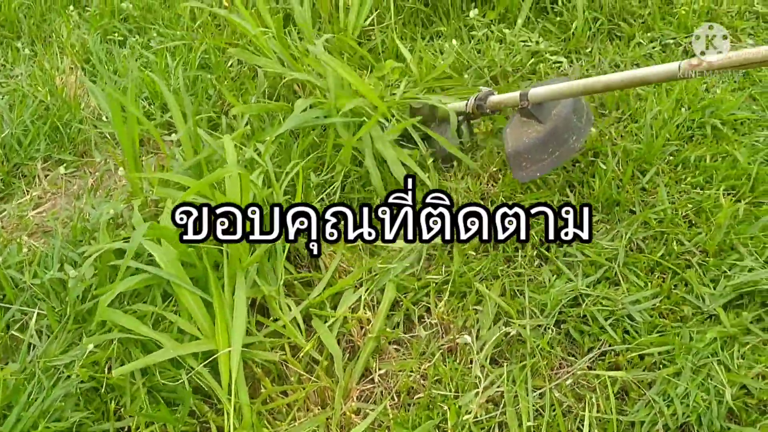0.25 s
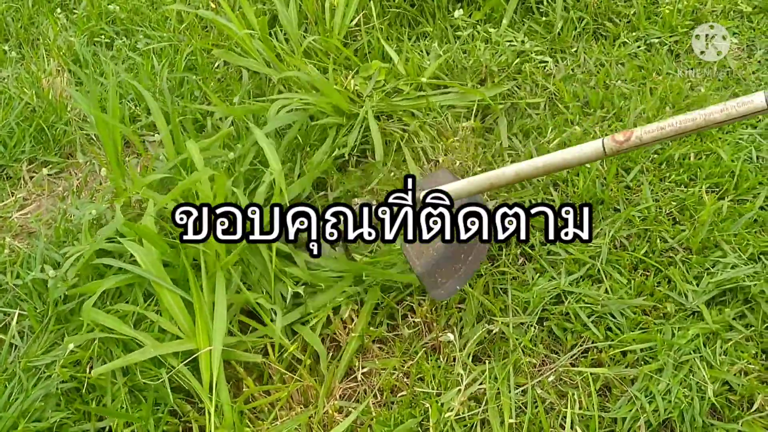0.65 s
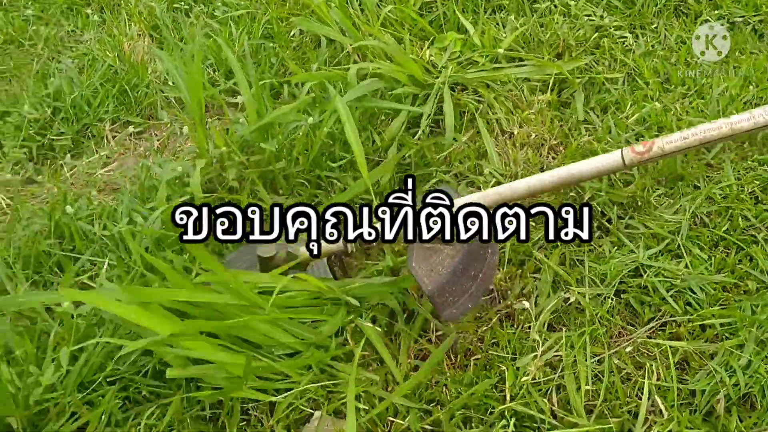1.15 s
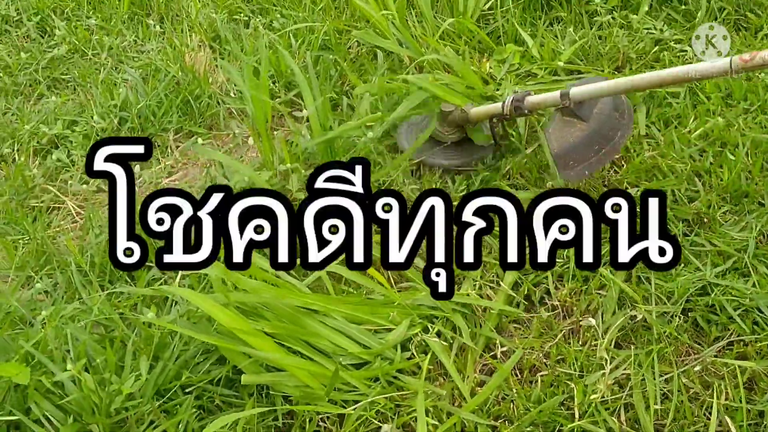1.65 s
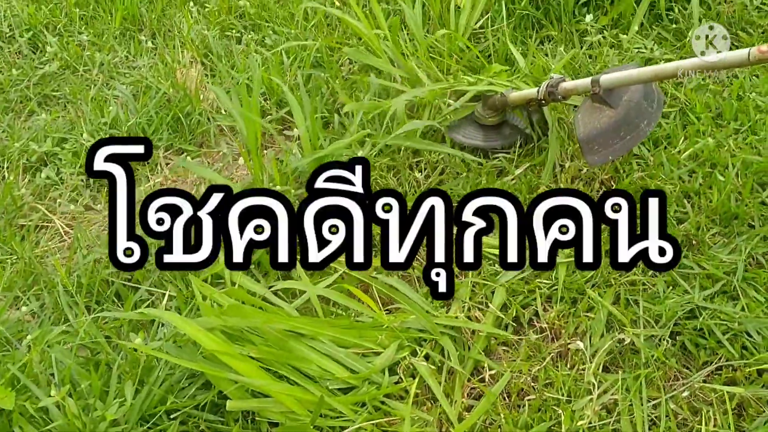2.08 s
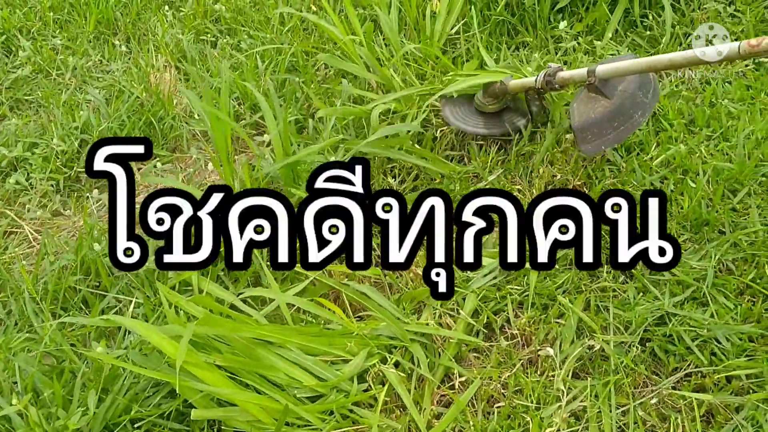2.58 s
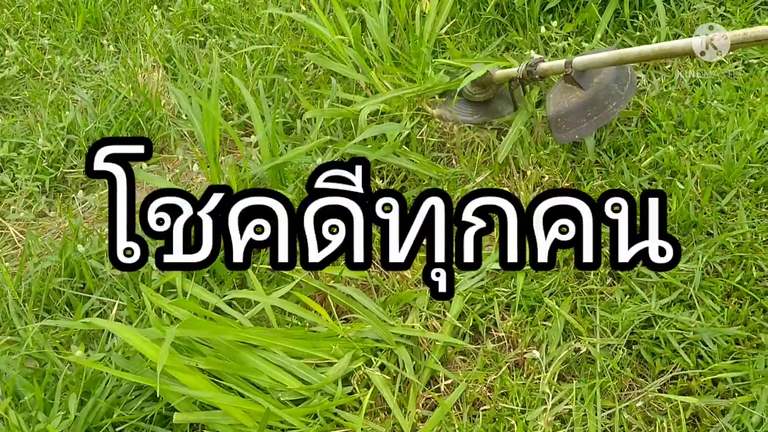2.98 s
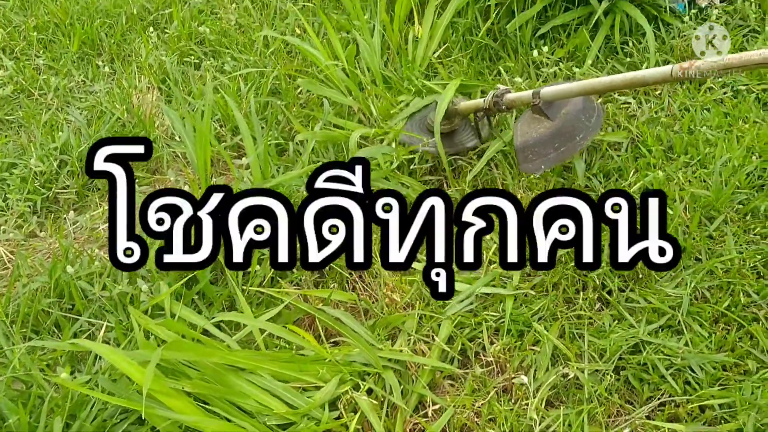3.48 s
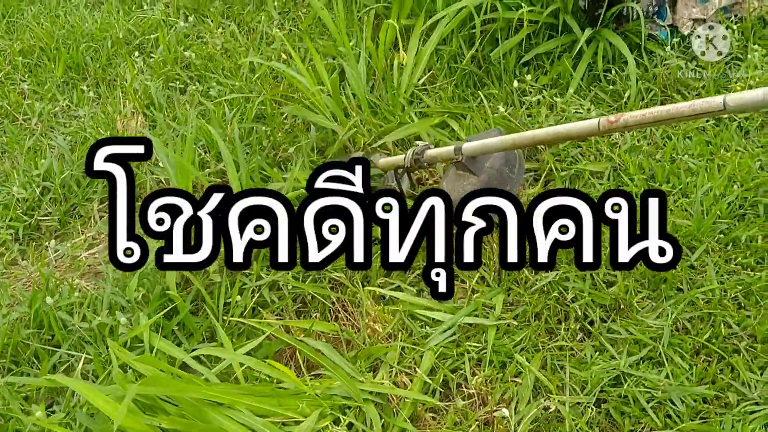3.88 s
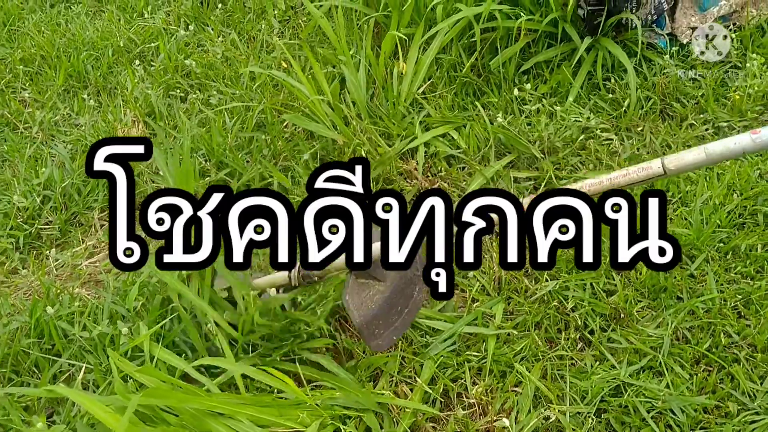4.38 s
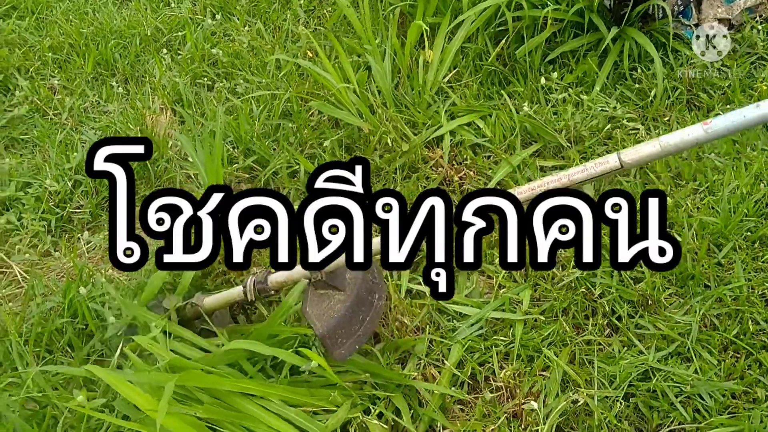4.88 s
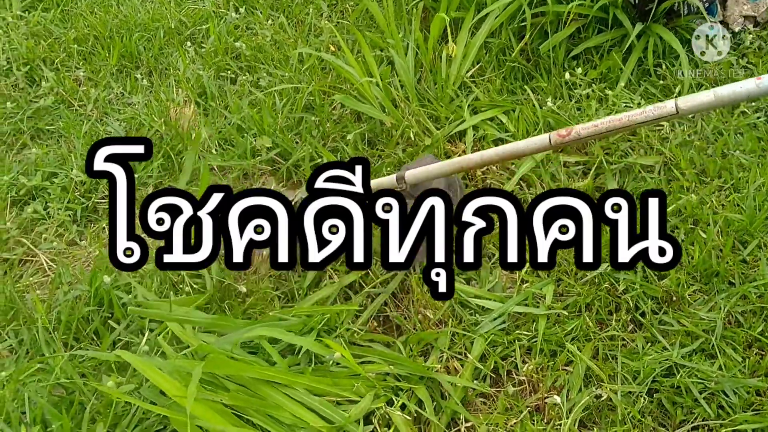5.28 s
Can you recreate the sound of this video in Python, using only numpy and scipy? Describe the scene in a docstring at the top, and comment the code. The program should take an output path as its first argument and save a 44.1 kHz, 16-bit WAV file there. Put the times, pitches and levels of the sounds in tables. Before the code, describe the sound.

Outdoors and close to a phone microphone, a small two-stroke brush cutter runs continuously at part throttle, firing unevenly with a coarse, sputtering bark. The drive shaft rattles metallically, while a spinning steel blade hisses and rings through grass in short swells. The bark softens early, returns strongly mid-way, then weakens again. Two short grinding bites stand out near two and just after three seconds.

```python
"""A two-stroke brush cutter at part throttle barks outdoors, close by, as its steel blade sweeps through grass.
The engine fires mostly every second or third turn: impulses ring muffler resonances and rattle the drive shaft.
Blade slashes are noise bursts through ringing steel modes, over the shaped hiss of torn grass and rushing air.
The clutch sings and the gears whine faintly as wavering sines; two thick stalks grind on the steel."""
import sys
import numpy as np
from scipy import signal
from scipy.fft import rfft, irfft
from scipy.io import wavfile
from scipy.ndimage import uniform_filter1d

SR = 44100
rng = np.random.default_rng(int(sys.argv[2]) if len(sys.argv) > 2 else 0)


def store_wav(level_fs):
    """Save 16-bit WAV to argv[1]."""
    pcm = np.round(np.clip(np.atleast_2d(level_fs), -1, 1) * 32767)
    wavfile.write(sys.argv[1], SR, pcm.T.astype(np.int16))


N = 244314
TIME = np.arange(N) / SR


def undb(db):
    """Decibels to amplitude gain."""
    return 10 ** (np.asarray(db) / 20)


def unit(x):
    """Scale to rms 1."""
    return x / np.sqrt(np.mean(x ** 2))


def curves(table):
    """Columns of a table, interpolated linearly over time."""
    time_s, *columns = np.transpose(table)
    return [np.interp(TIME, time_s, column) for column in columns]


def walk(rate_hz):
    """Smooth random wander of rms 1, with rate_hz new random values per second."""
    step = int(SR / rate_hz)
    held = np.repeat(rng.standard_normal(N // step + 1), step)
    return unit(uniform_filter1d(held, step)[:N])


def ring(x, modes):
    """Sum of parallel resonances (centre_hz, width_hz, gain_db) driven by x."""
    total = 0
    for centre_hz, width_hz, gain_db in modes:
        b, a = signal.iirpeak(centre_hz, centre_hz / width_hz, fs=SR)
        total = total + undb(gain_db) * signal.lfilter(b, a, x)
    return total


def cut(x, cutoff_hz, kind, order):
    """Butterworth low-pass or high-pass."""
    return signal.sosfilt(signal.butter(order, cutoff_hz, kind, fs=SR, output="sos"), x)


def noise(spectrum):
    """Gaussian noise of rms 1, shaped by (frequency_hz, density_db) points on a log-frequency axis."""
    frequency_hz, density_db = np.transpose(spectrum)
    bins_hz = np.maximum(np.fft.rfftfreq(N, 1 / SR), 1)
    gain = undb(np.interp(np.log(bins_hz), np.log(frequency_hz), density_db))
    return unit(irfft(rfft(rng.standard_normal(N)) * gain, N))


def impulses(times_s, sizes):
    """One impulse at each time."""
    at = np.round(times_s * SR).astype(int)
    inside = (at >= 0) & (at < N)
    return np.bincount(at[inside], sizes[inside], N)


def fade(x, decay_s):
    """Give each impulse an exponential tail."""
    return signal.lfilter([1], [1, -np.exp(-1 / (decay_s * SR))], x)


def passes(phase):
    """Times in seconds at which a phase in turns completes a turn."""
    return TIME[1:][np.diff(np.floor(phase)) > 0]


def with_swells(steady_db, rows):
    """Level in dB of a steady power plus bell-shaped swells (middle_s, length_s, level_db)."""
    power = undb(steady_db) ** 2
    for middle_s, length_s, level_db in rows:
        power = power + undb(level_db) ** 2 * np.exp(-(2 * (TIME - middle_s) / length_s) ** 2)
    return 10 * np.log10(power)


def combustion(turns_s):
    """Pick the firing turns and their knocks: the cylinder usually needs two or three turns to clear."""
    # chance that a firing takes three turns, not two: time_s, chance
    misfire = [(0, .4), (1.2, .7), (2.0, .3), (2.8, .08), (3.5, .55), (4.05, .3), (4.6, .35), (5.0, .7),
               (5.5, .15)]
    # hard drive-shaft knocks: time_s, over_usual_db
    knocks = [(.131, 2), (.509, 6), (2.344, 4), (2.612, 2.5), (3.5, 5), (3.534, 2), (3.628, -0.5),
              (3.661, 8), (3.843, 6), (3.979, 4.5), (4.187, 4), (4.221, 4), (4.258, 6.5), (4.866, 9),
              (4.986, 4)]
    slow = rng.random(len(turns_s)) < np.interp(turns_s, *np.transpose(misfire))
    knock_db = np.zeros(len(turns_s))
    for time_s, over_usual_db in knocks:
        knock_db[np.argmin(abs(turns_s - time_s))] = over_usual_db
    fired = np.zeros(len(turns_s), bool)
    due = 0
    for k in range(len(turns_s)):
        # a knocking turn always fires, after an unfired one
        knock_next = knock_db[k + 1:k + 2].any()
        if knock_db[k] or (k >= due and not knock_next):
            fired[k] = True
            due = k + 2 + slow[k]
    return fired, knock_db


def exhaust(turns_s, fired, bark_level_db):
    """Firings bark through muffler modes; unfired turns give a weak port pulse and a softer, later puff."""
    # low muffler resonances after a firing: centre_hz, width_hz, gain_db
    body_modes = [(123.4, 33, 14), (198, 44, 4), (298, 45, 15.5), (433, 53, 8)]
    # middle muffler resonances, the bark: centre_hz, width_hz, gain_db
    bark_modes = [(535, 50, -10), (603.5, 30, -0.5), (668, 52, 8)]
    # upper muffler resonances, the hard edge: centre_hz, width_hz, gain_db
    edge_modes = [(870, 19, 9.5), (947, 32, 13.5), (1010, 26, 9)]
    # muffler resonances after an unfired turn: centre_hz, width_hz, gain_db
    puff_modes = [(132, 350, 6.5), (303, 27, 2), (358, 35, 6.5), (407, 40, 3), (626, 33, 5)]
    puff_lag_s, puff_db, puff_db_per_bark_db = 0.0017, -3.0, -0.29
    port_share = 0.25  # amplitude against a firing, at full bark
    body_db, bark_db, edge_db = -29.5, -27.3, -31  # at full bark

    size = undb(.6 * rng.standard_normal(len(turns_s)))
    bangs = impulses(turns_s, size * fired)
    port_pulses = port_share * undb(bark_level_db) * impulses(turns_s, size * ~fired)
    blasts = bangs + port_pulses
    # an unfired charge swells gently through both muffler chambers
    puffs = impulses(turns_s + puff_lag_s, size * ~fired)
    puff = unit(ring(ring(puffs, puff_modes), [(312, 390, 0)]))
    puff = puff * undb(puff_db + puff_db_per_bark_db * bark_level_db)
    thump = unit(cut(ring(bangs, body_modes), 800, "low", order=2))
    body = unit(cut(thump + puff, 44, "high", order=2))
    bark = unit(cut(ring(blasts, bark_modes), 773, "low", order=4))
    edge = unit(cut(ring(blasts, edge_modes), 1060, "low", order=6))
    return (body * undb(body_db)
            + bark * undb(bark_db + bark_level_db)
            + edge * undb(edge_db + 0.94 * bark_level_db))


def machinery(phase, bark_level_db, firings_s):
    """The piston hums once a turn, gear teeth whine, the slipping clutch drum sings, jogged by firings."""
    # clutch drum sings out: middle_s, length_s, level_db
    squeals = [(0.275, 0.3, -32.5), (0.614, 0.22, -31), (0.937, 0.36, -33), (2.08, 0.47, -33),
               (3.26, .16, -34), (4.55, .2, -31.5)]
    teeth = 18
    drum_ring_s = 0.024
    hum_db = -29.0 + 0.21 * bark_level_db + .5 * walk(7.4)
    hum = undb(hum_db) * np.cos(2 * np.pi * phase)
    whine_db = -41.5 + 0.55 * bark_level_db + 1.1 * walk(16)
    whine = undb(whine_db) * np.sin(2 * np.pi * teeth * phase + 0.55 * walk(50))
    drum_hz = 2105 + 10 * walk(4) + 40 * walk(300)
    drum = np.sin(2 * np.pi * np.cumsum(drum_hz) / SR)
    jogs = fade(impulses(firings_s, np.ones(len(firings_s))), drum_ring_s) + .5
    clutch = unit(jogs * undb(2.5 * walk(90)) * drum)
    # between squeals a faint ring remains, louder when the bark is weak
    clutch_db = with_swells(-44 - 0.8 * bark_level_db, squeals)
    return hum + whine + clutch * undb(clutch_db)


def shaft(turns_s, fired, knock_db, bark_level_db):
    """Each firing jolts the drive shaft, which slaps its tube a moment later and chatters out."""
    # shaft tube and gear head: centre_hz, width_hz, gain_db
    shaft_modes = [(2576, 270, 0), (2950, 810, 0.5), (4060, 520, -2.5), (5340, 97, 6), (5960, 240, 4),
                   (6790, 124, 10), (7760, 380, 7), (8800, 610, 9), (15000, 3000, -3)]
    slap_lag_s, rattle_decay_s = 0.0033, 0.0053
    settle_start_s, settle_fade_s, settle_db = 4.346, 0.49, -3.5  # late drop in level
    usual_db = 1.5 * rng.standard_normal(len(turns_s))
    size = fired * undb(np.where(knock_db != 0, knock_db, usual_db))
    jolts = 0.5 * impulses(turns_s, size)
    slaps = 0.27 * impulses(turns_s + slap_lag_s, size)
    chatter = (fade(jolts + slaps, rattle_decay_s) + 0.086) * rng.standard_normal(N)
    # shifting contact keeps changing the balance of the resonances
    rattle = unit(sum(ring(chatter, [mode]) * undb(1.7 * walk(30)) for mode in shaft_modes))
    settled = np.clip((TIME - settle_start_s) / settle_fade_s, 0, 1)
    return rattle * undb(-22.5 + 0.14 * bark_level_db + settle_db * settled)


def blade(phase):
    """Two tips slash once each per blade turn; loose stalks tick at random; noise bursts ring the steel."""
    # steel blade, bright ring: centre_hz, width_hz, gain_db
    blade_modes = [(8600, 300, 8), (9084, 340, 10), (9500, 540, 0), (10560, 990, -11), (12600, 300, -14),
                   (14500, 510, -6.5)]
    # lower ring as stalks scrape along: centre_hz, width_hz, gain_db
    scrape_modes = [(3536, 180, 10), (4010, 130, 2)]
    # torn grass spectrum: frequency_hz, density_db
    shred = [(1100, -16), (1800, -15.5), (2700, -0.5), (4000, -0.5), (4700, -2.5), (6500, -2.5),
             (10000, -9.5), (13200, -18), (15500, -0.5)]
    gear_ratio = 0.93  # blade turns per crank turn
    scatter_db, stalks_per_s = 4.0, 300
    tip_jitter_s, power_decay_s = 0.0017, .0017
    tips_s = passes(2 * gear_ratio * phase)
    tips_s = tips_s + tip_jitter_s * rng.standard_normal(len(tips_s))
    slashes = impulses(tips_s, undb(scatter_db * rng.standard_normal(len(tips_s))))
    stalks = (rng.random(N) < stalks_per_s / SR) * undb(scatter_db * rng.standard_normal(N))
    hit_power = slashes ** 2 + 0.46 * stalks ** 2
    contact = np.sqrt(fade(hit_power, power_decay_s) + 1.17)
    steel = unit(ring(contact * rng.standard_normal(N), blade_modes))
    scrape = unit(ring(contact * rng.standard_normal(N), scrape_modes))
    grass = unit((contact + .5) * noise(shred))
    return steel, scrape, grass


def cutting(phase):
    """The blade rings and scrapes through grass, swelling in tufts; scrape load also drives the hiss."""
    # steady cutting: time_s, ring_db, scrape_load_db (-33 = reference load)
    sweep = [(0, -13, -40), (.2, -18, -36), (.55, -17, -30.5), (.95, -18, -28.5), (1.3, -22, -30),
             (1.8, -22, -33.5), (2.25, -22.5, -37), (2.6, -23, -34), (2.9, -17.5, -34.5), (3.15, -18, -35),
             (3.55, -24.5, -33.5), (3.9, -19, -34.5), (4.15, -23.5, -34.5), (4.45, -19.5, -32.5),
             (4.9, -23.5, -32), (5.54, -23, -35)]
    # blade meets a tuft: middle_s, length_s, ring_db, scrape_load_db (same reference)
    tufts = [(0.01, 0.15, -16.5, -35), (1.04, .08, -17, -34.5), (1.406, 0.079, -14.5, -28.5),
             (1.633, 0.17, -15.5, -36), (1.972, 0.14, -11, -29), (2.11, 0.086, -16, -46),
             (2.397, 0.096, -16, -42), (3.216, 0.087, -14, -35), (4.348, 0.089, -16, -31.5),
             (5.276, 0.084, -19, -31.5)]
    steady_ring_db, steady_load_db = curves(sweep)
    ring_db = with_swells(steady_ring_db, [(s, length, level) for s, length, level, _ in tufts])
    load_db = with_swells(steady_load_db, [(s, length, load) for s, length, _, load in tufts]) + 33
    steel, scrape, grass = blade(phase)
    # with load the lower ring grows faster than the hiss
    return (steel * undb(ring_db + 1.0 * walk(20))
            + scrape * undb(-36.0 + 1.83 * load_db)
            + grass * undb(-24.5 + 0.52 * load_db))


def bites():
    """Thick stalks grind on the steel: shaped noise under short, flat-topped pressure pulses."""
    # blade bites into thick stalks: start_s, length_s, level_db
    bite_rows = [(1.988, 0.036, -7), (3.193, 0.035, -8)]
    # grinding spectrum: frequency_hz, density_db
    grind = [(1200, -11), (3000, -20), (3900, 0), (5000, -26), (7200, -4), (8800, 9), (11000, 0.5),
             (13200, -7.5), (15300, 0.5)]
    pressure = 0
    for start_s, length_s, level_db in bite_rows:
        pressure = pressure + undb(level_db) * np.exp(-(2 * (TIME - start_s) / length_s - 1) ** 4)
    return pressure * noise(grind) * undb(2.0 * walk(400))


def cooling_air():
    """Cooling air rushes: shaped noise with a slowly wandering level."""
    # air spectrum: frequency_hz, density_db
    air_spectrum = [(20, -10), (50, 8), (75, -4.5), (150, 3), (400, 2), (750, 2.5), (1200, -1), (2000, -5),
                    (5000, -15), (15000, -14.5)]
    return noise(air_spectrum) * undb(-31.5 + 0.77 * walk(5.86))


def scene():
    """One crankshaft phase drives exhaust, machinery, shaft and blade; cooling air rushes underneath."""
    # crankshaft speed before a slight wobble: time_s, turns_hz
    speed = [(0.0, 85.35), (0.2, 82.57), (0.5, 80.54), (0.8, 80.18), (1.75, 80.38), (2.0, 82.2),
             (2.25, 81.7), (2.55, 81.84), (2.8, 85.62), (3.2, 85.7), (3.75, 88.04), (4.0, 86.5),
             (4.25, 86.63), (4.45, 83.2), (4.7, 83.22), (5.1, 81.25), (5.54, 81.95)]
    # how strongly the exhaust barks, also moves edge, rattle and whine: time_s, bark_level_db (0 = full)
    bark_levels = [(0, -4.5), (.3, -2), (1.0, -9.5), (1.5, -10), (2.1, -1.5), (2.85, -1), (3.75, 0),
                   (4.25, -2.5), (4.75, -8), (5.15, -9.5), (5.54, -6.5)]
    speed_hz, = curves(speed)
    bark_level_db, = curves(bark_levels)
    phase = np.cumsum(speed_hz * (1 + .0012 * walk(25))) / SR  # turns
    turns_s = passes(phase)
    fired, knock_db = combustion(turns_s)
    engine = exhaust(turns_s, fired, bark_level_db) + machinery(phase, bark_level_db, turns_s[fired])
    rattle = shaft(turns_s, fired, knock_db, bark_level_db)
    return (engine + rattle + cutting(phase) + bites() + cooling_air())[None]


def record(dry):
    """The phone clips peaks at 0.9, then a steep low-pass removes the top."""
    top_hz = 15500
    low_pass = signal.ellip(12, .2, 80, top_hz, fs=SR, output="sos")
    return signal.sosfilt(low_pass, np.clip(dry, -.9, .9))


dry = scene()
out = record(dry)
store_wav(out)
```